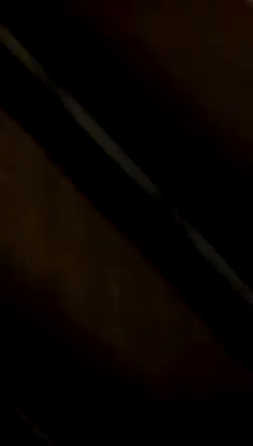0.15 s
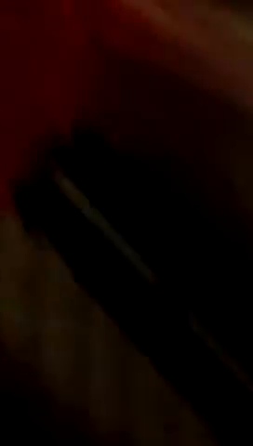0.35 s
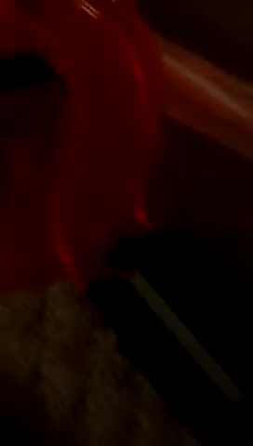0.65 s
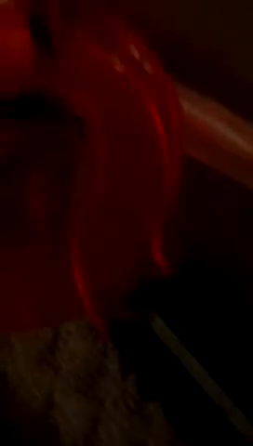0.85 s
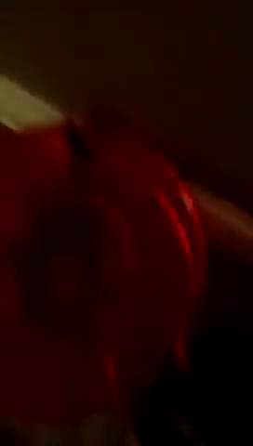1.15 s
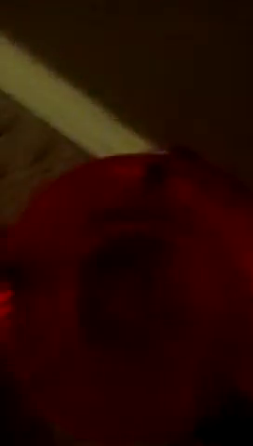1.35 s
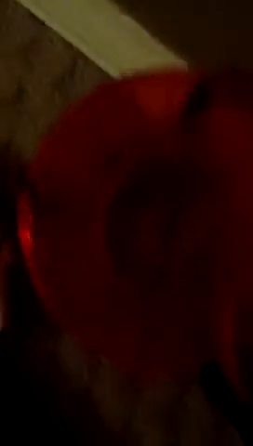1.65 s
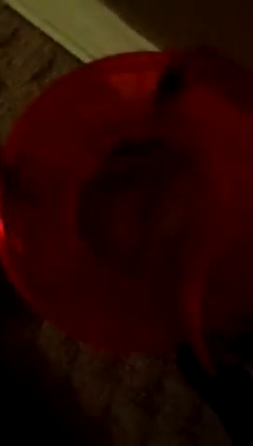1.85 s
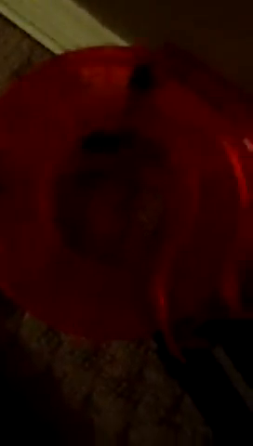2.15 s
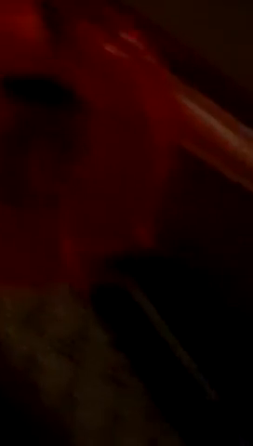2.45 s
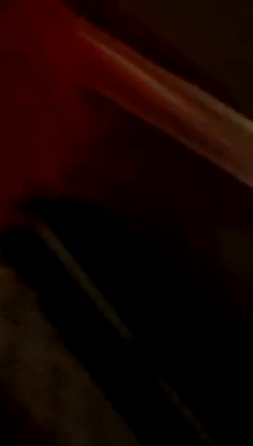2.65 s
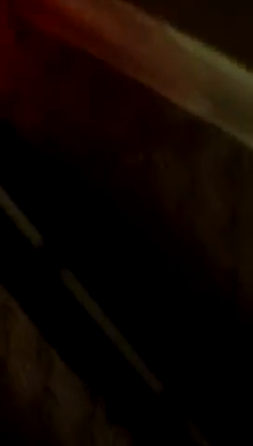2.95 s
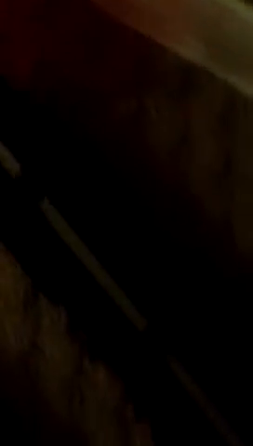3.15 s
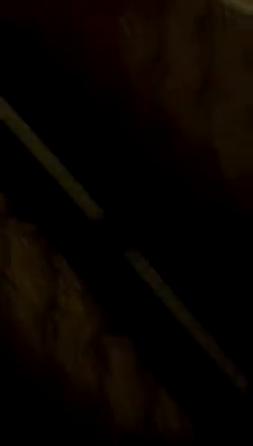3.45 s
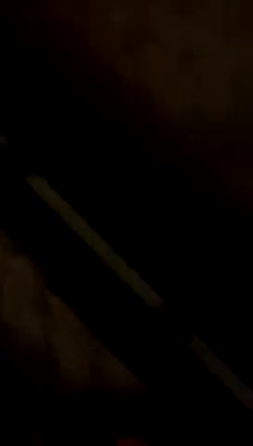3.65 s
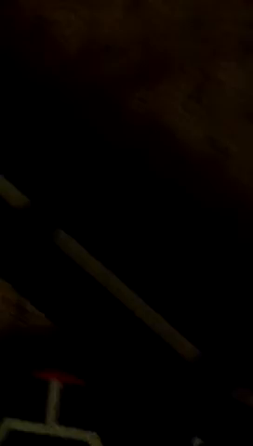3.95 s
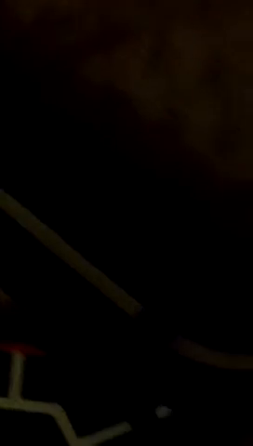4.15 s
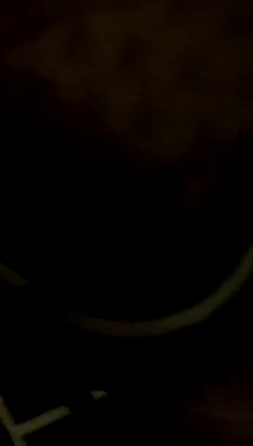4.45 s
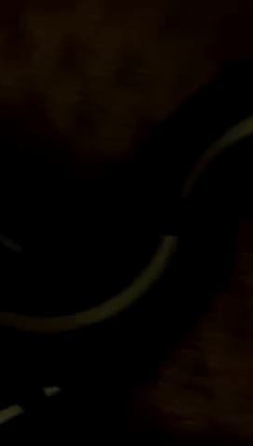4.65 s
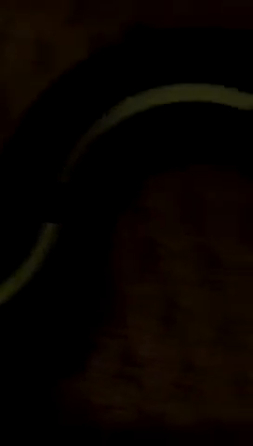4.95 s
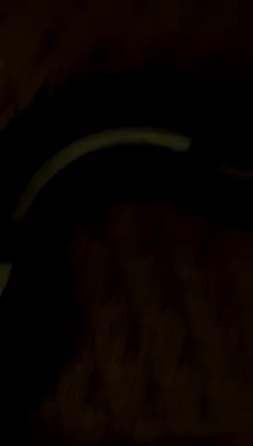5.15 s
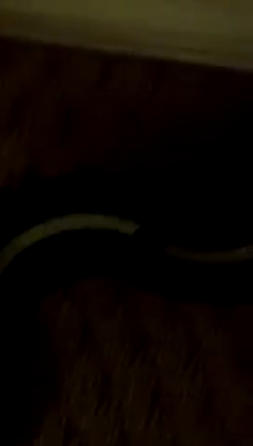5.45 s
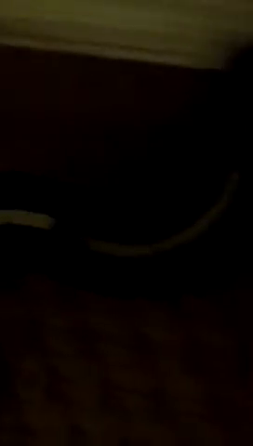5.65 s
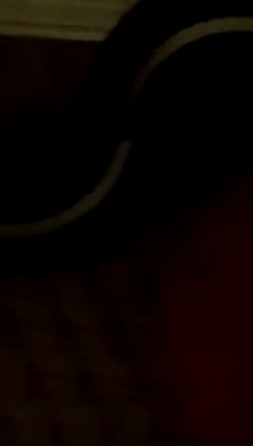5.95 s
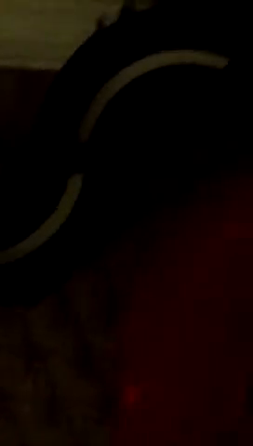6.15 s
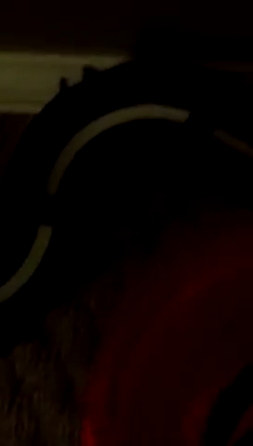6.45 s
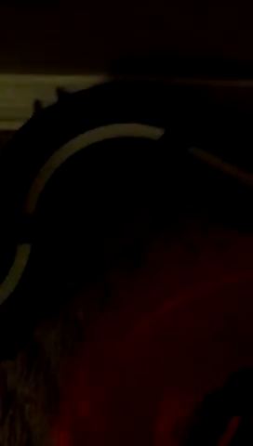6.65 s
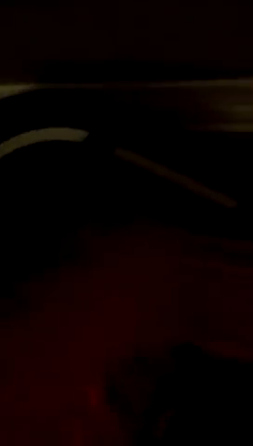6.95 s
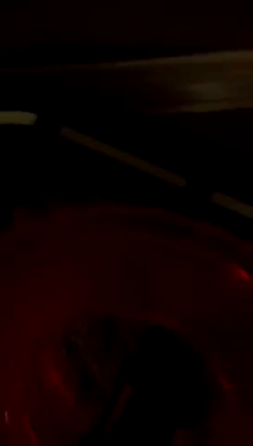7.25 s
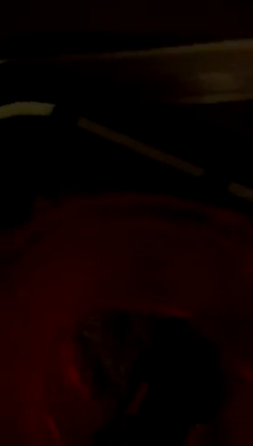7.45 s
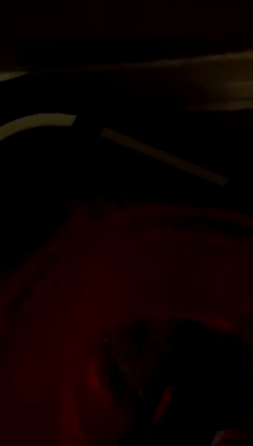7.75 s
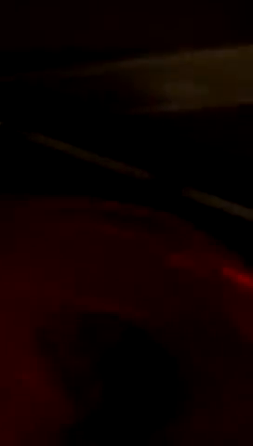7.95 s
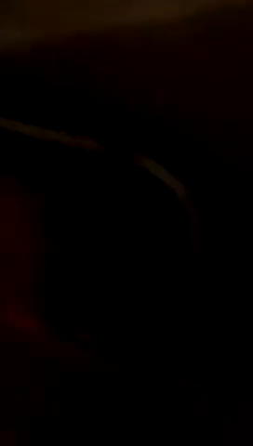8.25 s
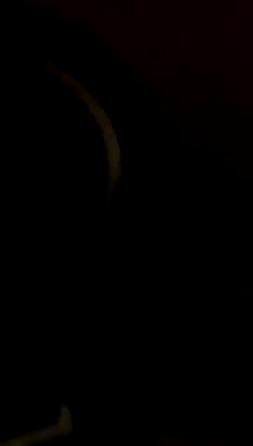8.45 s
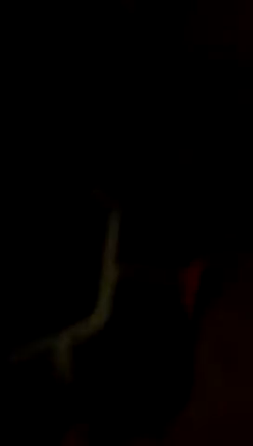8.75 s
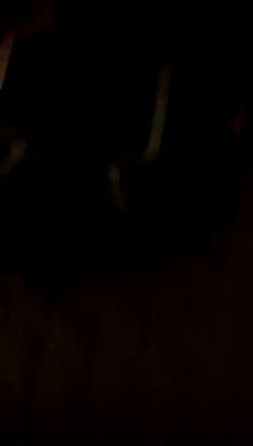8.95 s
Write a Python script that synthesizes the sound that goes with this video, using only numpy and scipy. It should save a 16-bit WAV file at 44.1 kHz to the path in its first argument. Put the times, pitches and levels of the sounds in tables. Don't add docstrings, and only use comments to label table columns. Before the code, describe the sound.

Small vibrating toys skitter on hollow plastic track over carpet, heard by a close hand-held microphone in a small room with a short, faint echo. From 0 to 3.6 seconds, dull thumps come irregularly, some fifteen to twenty a second, strongest around 0.6 to 3.0, ringing the plastic with light ticks and rattles; crisp snaps jump out near 2.0, 2.7 and 3.1. From about 3.7 the taps are quieter and sparser, with a brighter, thin-walled clatter until 5.3, then scrabble through bends. Two hard, dry knocks crack at 5.7 and 5.9, the loudest moments. From 7 to 8.2 weaker taps pass farther away. Near 8.3 it thins almost to hiss, then scrapes and hollow clacks follow, with weak ringing knocks at 8.7 and 8.95. Motors hum low through the plastic with a faint wavering high whine.

```python
import sys
import numpy as np
from scipy import signal
from scipy.fft import rfft, irfft, next_fast_len
from scipy.io import wavfile
from scipy.ndimage import uniform_filter1d

SR = 44100
rng = np.random.default_rng(int(sys.argv[2]) if len(sys.argv) > 2 else 0)


def pcm_store(signal):
    levels = np.round(np.clip(np.atleast_2d(signal), -1, 1) * 32767)
    wavfile.write(sys.argv[1], SR, levels.astype(np.int16).T)


def decibels_to_gain(level_db):
    exponent = np.asarray(level_db, float) / 20
    return 10 ** exponent


N = 400869

# (time [s], peak [dB], hardness as clack re peak [dB])
BOWL_LANDINGS = [(.065, -30.5, -16), (.113, -38, -32), (.153, -42, -14), (.165, -30, -5.5), (.253, -36, -32),
                 (.2846, -31, -18), (.307, -38, -15), (.33, -35.5, -12), (.366, -28.5, -14), (.411, -35, -32),
                 (.448, -28, -5), (.507, -27, -23.5), (.5615, -28, -26), (.5687, -25, -14), (.5944, -25, -21),
                 (.629, -24, -17.5), (.676, -24.5, -14.5), (.718, -21, -16), (.88, -26, -13.5),
                 (.936, -35, -20), (.983, -33, -27), (1.022, -29, -5), (1.0807, -21.5, -15.5),
                 (1.124, -24.5, -20), (1.143, -26, -24), (1.2, -21.5, -19.5), (1.241, -23, -20.5),
                 (1.3015, -24.5, -20.5),
                 (1.345, -25.5, -11.5), (1.394, -23.5, -16), (1.466, -27, -23), (1.53, -30, -15),
                  (1.57, -24, -15.5), (1.619, -25, -19), (1.694, -30.5, -15), (1.7227, -25, -18.5),
                  (1.815, -30.5, -24.5), (1.842, -35.5, -32), (1.871, -27.5, -20), (1.905, -25, -19),
                  (1.948, -60, -2), (1.9663, -24, -11), (2.0023, -16.5, -11), (2.0545, -30, -24),
                  (2.06, -22.5, -13.5), (2.101, -37, -29), (2.141, -38.5, -7), (2.161, -31, -19.5),
                  (2.198, -32.5, -15), (2.22, -27, -15.5), (2.268, -26, -25.5), (2.335, -18.5, -13.5),
                  (2.3861, -22.5, -10), (2.437, -29.5, -24),
                 (2.484, -33, -2.5), (2.53, -29.5, -15), (2.597, -27, -18), (2.64, -28.5, -31),
               (2.682, -57, 5), (2.6973, -27, -15), (2.716, -31, -23), (2.75, -29, -16.5),
               (2.778, -26, -17.5), (2.837, -28.5, -28.5), (2.881, -31.5, -12.5), (2.932, -25, -18),
               (2.99, -21, -9), (3.05, -30.5, -21), (3.081, -28, -15.5), (3.144, -26, -15.5),
               (3.199, -41.5, -3), (3.242, -43, -7), (3.27, -37.5, -14), (3.347, -29, -13.5),
               (3.398, -33.5, -33), (3.434, -26.5, -22), (3.4847, -25, -11), (3.52, -26.5, -8.5),
               (3.56, -31.5, -19), (3.621, -38.5, -33.5)]
# (time [s], peak [dB], hardness [dB])
STRAIGHT = [(3.666, -45, -11), (3.683, -36, -35), (3.746, -37, -15), (3.774, -29.5, -19.5), (3.796, -42, 2),
            (3.856, -38.5, -26), (3.893, -49, -27), (3.948, -64, 11), (3.98, -33.5, -22.5),
            (4.0367, -41.5, -2), (4.104, -29.5, -14.5), (4.1709, -32, -9.5), (4.223, -37, -34),
            (4.275, -31, -6), (4.356, -35.5, -18), (4.386, -51, -10), (4.437, -25, -15.5),
            (4.504, -35, -2.5), (4.536, -39.5, -0.5), (4.58, -53.5, 7.5), (4.626, -46.5, -4),
            (4.647, -40, -19), (4.704, -44, -2), (4.762, -38, -8), (4.826, -36, 1), (4.869, -26.5, -10.5),
            (4.978, -35, -4.5), (5.088, -31, -17), (5.198, -35.5, -4)]
# (time [s], peak [dB], hardness [dB])
BENDS = [(5.266, -37.5, -7), (5.301, -37, -34), (5.372, -33.5, -31), (5.409, -36.5, -10),
         (5.451, -43.5, 3.5), (5.506, -45.5, 1), (5.561, -41, -18), (5.608, -31.5, -7.5), (5.686, -35, -12),
         (5.717, -34, 6), (5.828, -33.5, -9.5), (5.868, -32, 3.5), (5.993, -38.5, -3.5), (6.017, -47, -7),
         (6.143, -38.5, -27), (6.276, -47, -1.5), (6.316, -46, -1), (6.345, -56, 1), (6.3872, -36.5, -11),
         (6.482, -45.5, -9), (6.527, -31, -8.5), (6.592, -36.5, -11.5), (6.636, -51, -7), (6.746, -51, -11),
         (6.822, -32.5, -17), (6.887, -36, -4), (6.949, -35.5, -9)]
# (time [s], peak [dB], hardness [dB])
FAR_BOWL = [(7.016, -32.5, -15.5), (7.08, -33.5, -17.5), (7.108, -41, -15), (7.143, -42, -19),
            (7.198, -46, -33), (7.245, -29.5, -7), (7.344, -52.5, 4.5), (7.401, -43.5, -7),
            (7.442, -50, -10), (7.53, -47, -9), (7.552, -35.5, -10), (7.618, -42, 0), (7.709, -47, 0.5),
            (7.749, -50, -4), (7.844, -50, -9), (7.88, -30.5, -3.5), (7.916, -39, -12), (7.945, -37.5, -9),
            (8.049, -42, -22), (8.099, -41, -1.5), (8.173, -39.5, -4.5), (8.215, -46, -31),
            (8.273, -44, -36), (8.538, -56, -15), (8.672, -46, -10), (8.707, -53, -8), (8.893, -58, -1),
            (8.952, -58, 11), (9.01, -41, -7)]
LANDINGS = BOWL_LANDINGS + STRAIGHT + BENDS + FAR_BOWL
# (frequency [Hz], level [dB])
TRACK = [(285, -11.5), (362, -13.5), (430, -8.5), (500, -6), (560, -7.5), (625, -13), (690, -5.5),
         (770, -4.5), (990, -5), (1130, -17.5)]
# (frequency [Hz], level [dB])
WALLS = [(1300, 0.5), (1460, 3), (1580, -3), (1710, 3.5), (1880, 1), (2070, -4.5), (2290, 3), (2450, -2),
         (2600, -2), (2850, -3), (3050, -15)]
# (frequency [Hz], level [dB])
SHELL = [(3480, 3.5), (3750, 7), (4150, 1), (4850, 1), (5460, 0.5), (6000, 3), (6650, 0), (7050, 3),
         (8060, 3), (8760, -6), (9600, 5)]
# (time [s], floor level [dB], wall mode [Hz], wall level [dB])
SPOTS = [(0.066, -39, 1190, -37.5), (0.568, -33, 1335, -30.5), (0.629, -24, 1770, -33),
         (0.676, -40, 1760, -48), (0.718, -28, 1880, -46), (0.88, -39, 1780, -28.5),
         (1.023, -22.5, 2070, -28.5), (1.0797, -21, 1650, -34), (1.124, -35, 1320, -32),
         (1.201, -27, 1230, -30.5), (1.242, -28, 1260, -40), (1.302, -30, 1730, -35),
         (1.346, -23, 1760, -34), (1.394, -33, 1300, -52), (1.467, -22, 1230, -37.5),
         (1.57, -35, 1700, -37), (1.619, -28, 1480, -36), (1.723, -31, 1250, -43), (1.816, -38, 1800, -42),
         (1.967, -33, 1510, -34), (2.002, -39, 1700, -19.5), (2.269, -21.5, 1220, -44),
         (2.335, -16.5, 1910, -24.5), (2.3855, -32, 1790, -23), (2.598, -33, 1730, -41),
         (2.698, -34, 1830, -29), (2.78, -24, 1150, -44), (2.932, -29, 1300, -52), (2.99, -26, 1660, -30.5),
         (3.051, -32, 1230, -43), (3.146, -38, 1360, -56), (3.435, -26, 1280, -38), (4.275, -20, 1340, -38),
         (4.827, -19, 2750, -27)]
# (time [s], peak [dB], ring [Hz])
STRUCK = [(.167, -41, 2920), (0.331, -38.5, 1930), (.451, -29, 2360), (.63, -35, 2130), (.678, -42, 1930),
          (.881, -39, 3570), (1.081, -38, 2060), (1.144, -36, 1220), (1.534, -42, 530), (1.62, -36, 2250),
          (2.0042, -24.5, 3580), (2.0042, -30, 7200), (2.06, -28.5, 1320), (2.3369, -30, 4000),
          (2.388, -27, 2090), (2.532, -36, 530), (2.992, -30, 3320), (3.522, -34, 1750),
          (4.173, -35.5, 2930), (4.278, -32, 2930), (4.507, -32.5, 3400), (4.829, -38, 1800),
          (4.871, -32.5, 2820), (5.2, -38.5, 3020), (5.609, -38, 2280), (5.7175, -24, 8800),
          (5.868, -17, 8800), (6.531, -35.5, 1830), (6.89, -35, 2610), (7.882, -33, 2220)]
# (time [s], peak [dB], ring [Hz])
BUMPS = [(0.0298, -41, 523), (0.206, -44, 440), (0.4184, -36.5, 427), (0.53, -43, 332), (0.85, -40, 454),
         (0.8603, -46, 473), (0.9122, -37.5, 423), (1.4884, -41, 516), (1.665, -41, 424),
         (1.77, -38.5, 440), (2.12, -45, 527), (2.141, -38, 610), (2.577, -47, 596), (3.2069, -35, 530),
         (3.7645, -41, 518), (4.9268, -46, 470), (5.055, -47, 493), (5.7774, -38, 603), (5.9299, -41, 780),
         (5.943, -42.5, 372), (6.112, -43.5, 368), (6.215, -51, 355), (6.782, -39, 520),
         (6.962, -39.5, 362), (7.182, -57, 373), (7.306, -45, 362), (7.4613, -41, 500), (7.673, -44, 362),
         (7.773, -49, 354), (7.975, -42, 363), (8.066, -38.5, 348), (8.2239, -42, 356), (8.2816, -44, 345),
         (8.5544, -40, 686), (8.5731, -41, 663)]
# (time [s], peak [dB],
# ring [Hz])
TICKS = [(0.332, -47, 1630), (0.4188, -46, 2420), (0.5374, -45, 1820), (0.4364, -40, 4100),
         (0.648, -43, 4120), (0.696, -53, 4100), (1.667, -45, 2000), (1.6749, -48, 1710),
         (1.8437, -50, 1690), (1.951, -39, 4120), (2.1027, -41, 3830), (2.388, -33, 1660),
         (2.8456, -43, 1700), (3.1586, -41, 3640), (3.304, -39.5, 3560), (3.3866, -50, 1720),
         (3.869, -47.5, 3970), (3.9964, -46.5, 1670), (4.225, -48, 2820), (4.4909, -51, 1520),
         (4.7346, -49, 2370), (5.738, -36, 3210), (5.89, -38, 1390), (6.961, -43, 1490),
         (8.7177, -45, 2300)]
# (time [s], peak [dB], ring [Hz])
END_CLACKS = [
    (8.538, -50, 690),
    (8.62, -47, 722),
    (8.64, -45, 865),
    (8.672, -38, 4620),
    (8.757, -43, 1017),
    (8.962, -40, 980),
    (9.012, -37.5, 1040),
    (9.012, -35, 3870),
]
# (time [s], peak [dB], long ring re peak [dB])
KNOCKS = [
    (5.717, -8.5, -23),
    (5.8678, -12, -34),
    (8.671, -27.5, -7),
    (8.953, -29.5, -8.5),
]
# (frequency [Hz], level [dB])
STIFF_RING = [(2290, -5.5), (2345, -15)]
# (frequency [Hz], density [dB per Hz])
KNOCK_COLOUR = [(290, -55.5), (500, 7), (968, -6), (1530, 6.5), (4130, 6), (8720, 3), (14600, -11.5),
                (15500, -21)]
# (time [s], peak [dB])
TOUCHES = [(0.001, -36.5), (0.613, -44), (0.7862, -37.5), (0.84, -43), (0.912, -38.5), (2.373, -45),
           (2.76, -46), (2.853, -56), (4.122, -41), (5.7754, -49), (5.931, -41), (6.688, -45), (6.978, -45),
           (8.711, -38), (9.0339, -34), (9.045, -40)]
# (time [s], snap peak [dB], shell tick [dB])
SNAPS = [(0.0668, -29, -46), (1.126, -39, -39), (1.5712, -32, -43), (2.0047, -12, -46), (2.686, -50, -39),
         (2.6982, -11.5, -41), (3.1463, -16, -46), (3.522, -22, -41), (4.276, -47, -47),
         (4.7073, -47, -46.5), (4.8288, -33, -41.5), (5.2, -51, -46.5), (5.61, -41, -37.5),
         (5.7174, -35, -62), (5.868, -8.5, -41), (6.9496, -31, -63), (7.0809, -26, -54), (7.9479, -25, -57),
         (8.953, -47, -46), (9.009, -50, -46)]
# (time [s], length [s], level [dB])
SCRAPES = [
    (0.839, 0.036, -75),
    (8.2, 0.039, -79),
    (8.532, 0.12, -68.5),
    (8.702, 0.066, -65.5),
    (8.961, 0.13, -63),
]
# (time [s], nearness of the microphone [dB], dipping deeply where the motors pause at 8.33 s, grip of
# the legs on the track [dB])
MOTORS = [(0, 4, 16.5), (.3, 2, -31), (.8, 4.5, -3), (1.3, -2.5, -16), (1.8, 1.5, -14), (2.4, -1, -10),
          (3.0, 2.5, 4.5), (3.5, 0.5, -3), (4.0, -4.5, 1), (5.2, -0.5, -3), (5.8, -4, 1.5), (6.9, -10, 3),
          (7.6, -2.5, 0), (8.2, -5, -2), (8.33, -43, -11), (8.41, -26, -6), (8.5, -8, 2.5),
          (9.09, -27, -0.5)]
# (frequency [Hz], width [Hz], level [dB])
HUM = [(344, 56, -7), (456, 177, -3), (633, 366, -2.5), (865, 49, -9), (1040, 410, -22.5)]
# (frequency [Hz], width [Hz], level [dB])
WHINE = [(14000, 720, 0), (14630, 900, -2.5), (10000, 480, -10), (6700, 6400, -3)]
# (frequency [Hz], width [Hz], level [dB])
DRONE = [(184.2, 30, 2), (318, 46, -5.5), (140, 8.3, -11.5), (236, 90, -7)]
# (frequency [Hz], width [Hz], level [dB])
NEAR_TRACK = [(290, 11, 0)]
# (frequency [Hz], width [Hz], level [dB])
FAR_TRACK = [(360, 14, 0), (678, 16, -5)]
# (start [s], end [s])
BUZZING = [
    (.4, .8),
    (3.45, 4.2),
]
# (frequency [Hz], density [dB per Hz])
HISS = [(24, -57), (40, -7), (161, -16), (2560, -5), (3130, -6), (5150, -7), (6280, -5), (15400, -6)]

USUAL_PEAK_DB, USUAL_HARDNESS_DB = -32, -15
TICK_DB, TICK_PER_PEAK, TICK_PER_HARDNESS = -19.5, -0.4, 0.34
RING_DB, RING_PER_PEAK, RING_PER_HARDNESS = -6.5, -0.48, 0.16
FAR_RING_DB = 4.5
BOWL_HZ, BOWL_T60_S, BOWL_DB = 856.6, 0.1, -8.5
BRIGHT_FROM_S, BRIGHT_TO_S, DULL_TILT_DB, BRIGHT_TILT_DB = 4, 5.3, 2, 7
LOOSE_CAP_HZ = 4110
DRONE_DB, HUM_DB, WHINE_DB, PIECE_DB, HISS_DB = -59, -55.5, -67.5, -59.5, -65
DRONE_FOLLOWS = 0.25
FAR_FROM_S, CROSSING_S = 4.5, 1.3
ROOM_T60_S, WALL_CUT_HZ, ROOM_DB = 0.19, 44000, -24
OVERLOAD = .3


def landings():
    s, peak_db, clack_db = np.transpose(LANDINGS)
    strong = peak_db - USUAL_PEAK_DB
    hard = clack_db - USUAL_HARDNESS_DB
    tick_db = TICK_DB + TICK_PER_PEAK * strong + TICK_PER_HARDNESS * hard
    ring_db = RING_DB + RING_PER_PEAK * strong + RING_PER_HARDNESS * hard
    ring_db = ring_db + FAR_RING_DB * (s > BRIGHT_FROM_S)
    bright_wall = (s + 0.001112 > BRIGHT_FROM_S) & (s + 0.001112 < BRIGHT_TO_S)
    s = s + 0.001112
    wall_db = peak_db + clack_db

    pitch_hz = 950 * 2 ** ((clack_db + 9.5) / 28)
    thump = thumps(s, peak_db, pitch_hz)
    hollow = strike(TRACK, s + 0.002303, peak_db + ring_db - 11.0, scatter_db=4.0, t60_at_1k=0.093)
    hollow += bowl(thumps(s, peak_db + ring_db + BOWL_DB, pitch_hz))

    tilt_db = np.where(bright_wall, BRIGHT_TILT_DB, DULL_TILT_DB)
    clack = strike(WALLS, s + 0.000984, wall_db - tilt_db - 12.5, scatter_db=4.0, t60_at_1k=0.044,
                   tilt_db=tilt_db)
    tick = strike(SHELL, s + .0013, peak_db + tick_db - 11.0, scatter_db=3.5, t60_at_1k=0.035)
    crack = noise_band(3000, 16500) * dying(s + 0.0011, peak_db + tick_db + 4.0, t60=0.02)
    rattle = noise_band(500, 3500) * dying(s + 0.0016, wall_db + 1.0, t60=0.039)
    thin_wall = dying(s[bright_wall] + 0.0035, wall_db[bright_wall] + 4.5, t60=0.023)
    rattle += noise_band(2400, 4200) * thin_wall

    late = rng.uniform(0.003996, .035, (len(s), 6))
    bounce_s = s[:, None] + late
    bounce_db = (wall_db + 0.65 * ring_db)[:, None] - 24.5 - 300 * late
    bounces = strike(TRACK[2:] + WALLS, bounce_s.ravel(), bounce_db.ravel(), scatter_db=6.0,
                     t60_at_1k=0.029, tilt_db=3.0)
    return thump + hollow + clack + tick + crack + rattle + bounces


def thumps(seconds, peak_db, pitch_hz):
    phase = np.arange(400) / SR * pitch_hz[:, None]
    window = np.sin(np.pi * np.clip(phase / 1.9, 0, 1)) ** 2
    shapes = -decibels_to_gain(peak_db)[:, None] * window * np.cos(2 * np.pi * (phase - .98))
    return place(shapes, seconds)


def bowl(push):
    r = decibels_to_gain(-60 / (BOWL_T60_S * SR))
    poles = [1, -2 * r * np.cos(2 * np.pi * BOWL_HZ / SR), r * r]
    return signal.lfilter([1, 0, -1], poles, push + 1e-18) * BOWL_HZ / SR


def contacts():
    s, peak_db, hz = np.transpose(BUMPS)
    out = pings(s - .002, peak_db, hz, cycles=25.5, rise_cycles=1.0, split=0.16)
    out += strike(TRACK, s, peak_db - 12.0, scatter_db=3.0, t60_at_1k=.05)

    s, peak_db, hz = np.transpose(TICKS)
    out += pings(s - .0005, peak_db - 5.5, hz, cycles=78, rise_cycles=0.92, split=-0.157)
    out += noise_band(1200, 6000) * dying(s, peak_db + 0.5, t60=0.018)

    s, peak_db, hz = np.transpose(STRUCK)
    out += pings(s, peak_db, hz, cycles=40, rise_cycles=0.72, split=0.074)

    s, floor_db, wall_hz, wall_db = np.transpose(SPOTS)
    floor_hz = np.full_like(s, BOWL_HZ)
    out += pings(s + 0.00269, floor_db - 11.0, floor_hz, cycles=26.6, rise_cycles=0.58, split=0.15)
    return out + pings(s + 0.00201, wall_db + 0.5, wall_hz, cycles=35, rise_cycles=0.96, split=-0.079)


def scrabble():
    s, peak_db, _ = np.transpose(STRAIGHT + BENDS + FAR_BOWL)
    grains = rng.standard_normal(N) * decibels_to_gain(2.2 * drift(230))
    envelope = uniform_filter1d(dying(s + 0.0066, 0.96 * peak_db - 7.5, t60=0.092), size=150)
    out = butter(grains, [450, 1200], "band") * envelope
    s, peak_db, hz = np.transpose(END_CLACKS)
    return out + pings(s, peak_db - 2.5, hz, cycles=58, rise_cycles=0.96, split=0.1)


def knocks():
    s, peak_db, ring_db = np.transpose(KNOCKS)
    s = s + 0.00029
    crack = dying(s, peak_db - 8.5, t60=0.015)
    slap = dying(s + 0.024, peak_db - 39.5, t60=0.24)
    tail = dying(s, peak_db - 36.5, t60=0.19)
    envelope = uniform_filter1d(crack + slap + tail, size=30)
    part = strike(STIFF_RING, s, peak_db + ring_db, scatter_db=.5, t60_at_1k=.12)
    return coloured(KNOCK_COLOUR) * envelope + part


def skitter(per_s, level_db):
    s, peak_db = np.transpose(TOUCHES)
    out = strike(SHELL + WALLS[6:], s + 0.00069, peak_db - 16.0, scatter_db=2.5, t60_at_1k=0.025, tilt_db=-1.5)
    near_bowl = (s > .5) & (s < 3)
    s, peak_db = s[near_bowl], peak_db[near_bowl]
    cap_hz = np.full_like(s, LOOSE_CAP_HZ)
    out += pings(s, peak_db - 8.0, cap_hz, cycles=106, rise_cycles=1.0, split=0.028)

    s, snap_db, tick_db = np.transpose(SNAPS)
    out += noise_band(10000, 17000) * dying(s + 0.00024, snap_db - 0.5, t60=0.0019)
    out += noise_band(2500, 13000) * dying(s + 0.00035, tick_db + 6.5, t60=0.014)

    s, length, scrape_db = np.transpose(SCRAPES)[:, :, None]
    progress = rng.random((len(SCRAPES), 60))
    slips = (s + length * progress).ravel()
    fading_db = (scrape_db - 4.0 * progress).ravel()
    out += strike(TRACK[1:] + WALLS, slips, fading_db, scatter_db=3.0, t60_at_1k=0.05, tilt_db=-6.5)
    out += noise_band(1000, 9000) * dying(slips, fading_db, t60=0.023)

    at = np.flatnonzero(rng.random(N) < per_s / SR)
    sizes_db = level_db[at] + 5.2 * np.minimum(rng.exponential(1, len(at)), 1.6)
    out += strike(SHELL + [(4200, 9)], at / SR + 0.02, sizes_db - 9.0, scatter_db=3.0, t60_at_1k=0.025)
    return out + strike(TRACK[2:] + WALLS, at / SR, sizes_db, scatter_db=4.0, t60_at_1k=.04, tilt_db=-3.0)


def motors(drone_db, hum_db, whine_db):
    floor_shake = rng.standard_normal(N) * decibels_to_gain(2.5 * drift(18))
    drone = decibels_to_gain(drone_db) * resonant(floor_shake, DRONE, flicker_db=2.0, flicker_hz=1.5)

    landed = np.minimum(dying(np.array(LANDINGS)[:, 0], 0, t60=0.15), 1)
    coupling = 0.32 + uniform_filter1d(landed, size=200)
    shake = rng.standard_normal(N) * decibels_to_gain(3.0 * drift(45))
    hum = decibels_to_gain(hum_db + 1.5) * coupling * resonant(shake, HUM, flicker_db=2.0, flicker_hz=5)

    whine = resonant(rng.standard_normal(N), WHINE, flicker_db=2.0, flicker_hz=6)
    whine += decibels_to_gain(-7.0) * strand(13900, wander_hz=400, width_hz=150)
    whine += decibels_to_gain(-14.0) * strand(9600, wander_hz=60, width_hz=200)
    whine += decibels_to_gain(-17.0) * strand(6900, wander_hz=196, width_hz=200)
    return drone + hum + decibels_to_gain(whine_db) * whine + decibels_to_gain(drone_db - DRONE_DB) * pieces()


def pieces():
    t = np.arange(N) / SR
    far = np.clip((t - FAR_FROM_S) / CROSSING_S, 0, 1)
    near_hum = resonant(rng.standard_normal(N), NEAR_TRACK, flicker_db=2.5, flicker_hz=2.5)
    far_hum = resonant(rng.standard_normal(N), FAR_TRACK, flicker_db=2.5, flicker_hz=2.5)
    corners = [s for on, off in BUZZING for s in (on - .1, on, off, off + .1)]
    near_hum *= decibels_to_gain(np.interp(t, corners, [-6, 2, 2, -6] * 2))
    return decibels_to_gain(PIECE_DB) * ((1 - far) * near_hum + far * far_hum)


def strand(centre_hz, wander_hz, width_hz):
    phase = 2 * np.pi * np.cumsum(centre_hz + wander_hz * drift(1.5)) / SR
    return rms_one(drift(width_hz) * np.cos(phase) * decibels_to_gain(2.5 * drift(3)))


def room(x):
    size = next_fast_len(N + SR // 2)
    hz = np.fft.rfftfreq(size, 1 / SR)
    answer = 0
    for k, lag in enumerate(rng.uniform(.009, 0.028, 10)):
        loss = decibels_to_gain(-60 * lag / ROOM_T60_S) / (1 + 1j * hz / WALL_CUT_HZ)
        loop = loss * np.exp(-2j * np.pi * hz * lag)
        answer = answer + (-1) ** k * loop / (1 - loop)
    return irfft(rfft(x, size) * answer, size)[:N]


def hiss():
    return decibels_to_gain(HISS_DB) * coloured(HISS)


def strike(modes, seconds, level_db, scatter_db, t60_at_1k, tilt_db=0):
    out = np.zeros(N)
    luck = np.clip(rng.standard_normal((len(seconds), 2 * len(modes))), -2, 2)
    for k, (hz, mode_db) in enumerate(modes):
        tilted_db = level_db + mode_db + tilt_db * np.log2(hz / 1000)
        heights = decibels_to_gain(tilted_db + scatter_db * luck[:, 2 * k]) * np.sign(luck[:, 2 * k + 1])
        out += ring(clicks(seconds, heights), hz, t60_at_1k * (1000 / hz) ** 0.31)
    return out


def ring(train, hz, t60):
    r, w = decibels_to_gain(-60 / (t60 * SR)), 2 * np.pi * hz / SR
    return signal.lfilter([0, np.sin(w)], [1, -2 * r * np.cos(w), r * r], train)


def pings(seconds, peak_db, pitch_hz, cycles, rise_cycles, split):
    turns = np.arange(3000) / SR * pitch_hz[:, None]
    envelope = decibels_to_gain(peak_db[:, None] - 60 * turns / cycles) * (1 - np.exp(-turns / rise_cycles))
    pair = np.sin(2 * np.pi * turns) + .5 * np.sin(2 * np.pi * turns * (1 + split))
    return place(envelope * pair, seconds)


def place(shapes, seconds):
    length = shapes.shape[1]
    at = (seconds * SR).astype(int)[:, None] + np.arange(length)
    return np.bincount(at.ravel(), shapes.ravel(), N + length)[:N]


def clicks(seconds, heights):
    train = np.full(N, 1e-18)
    np.add.at(train, np.clip((np.asarray(seconds) * SR).astype(int), 0, N - 1), heights)
    return train


def dying(seconds, level_db, t60):
    return signal.lfilter([1], [1, -decibels_to_gain(-60 / (t60 * SR))], clicks(seconds, decibels_to_gain(level_db)))


def resonant(x, peaks, flicker_db, flicker_hz):
    out = 0
    for k, (hz, width_hz, peak_db) in enumerate(peaks):
        r = np.exp(-np.pi * width_hz / SR)
        band = signal.lfilter([1, 0, -1], [1, -2 * r * np.cos(2 * np.pi * hz / SR), r * r], x)
        out = out + (-1) ** k * decibels_to_gain(peak_db + flicker_db * drift(flicker_hz)) * rms_one(band)
    return rms_one(out)


def coloured(spectrum):
    hz = np.fft.rfftfreq(N, 1 / SR) + 1
    points = np.array(spectrum)
    shape = decibels_to_gain(np.interp(np.log(hz), np.log(points[:, 0]), points[:, 1]))
    return rms_one(irfft(rfft(rng.standard_normal(N)) * shape, N))


def noise_band(low_hz, high_hz):
    return butter(rng.standard_normal(N), [low_hz, high_hz], "band")


def drift(rate_hz):
    return rms_one(butter(rng.standard_normal(N + SR), rate_hz, "low")[SR:])


def butter(x, hz, kind, order=2):
    return signal.sosfilt(signal.butter(order, hz, kind, fs=SR, output="sos"), x)


def rms_one(x):
    return x / np.sqrt(np.mean(x ** 2) + 1e-20)


def scene():
    s, *controls_db = np.transpose(MOTORS)
    near_db, grip_db = [np.interp(np.arange(N) / SR, s, control) for control in controls_db]
    whine_db = WHINE_DB + near_db
    blows = landings() + contacts() + scrabble() + knocks() + skitter(per_s=65, level_db=whine_db - 5.5)
    running = motors(DRONE_DB + DRONE_FOLLOWS * near_db, HUM_DB + grip_db, np.maximum(whine_db, WHINE_DB - 13))
    toys = blows + decibels_to_gain(ROOM_DB) * room(blows) + running
    return (butter(toys, 106.0, "high", order=4) + hiss())[None]


def low_pass(x):
    return signal.sosfilt(signal.butter(12, 16520, fs=SR, output="sos"), x)


def record(dry):
    dry = OVERLOAD * np.tanh(dry / OVERLOAD)
    body = signal.sosfilt(signal.ellip(12, .5, 60, 15280, fs=SR, output="sos"), dry)
    top = signal.sosfilt(signal.cheby2(6, 60, [14900, 16700], "band", fs=SR, output="sos"), dry)
    sharp = uniform_filter1d(np.abs(top), size=200) > decibels_to_gain(-65)
    gate = uniform_filter1d(sharp * 1., size=200)
    return low_pass(body + decibels_to_gain(-19) * top * gate)


dry = scene()
out = record(dry)
pcm_store(out)
```